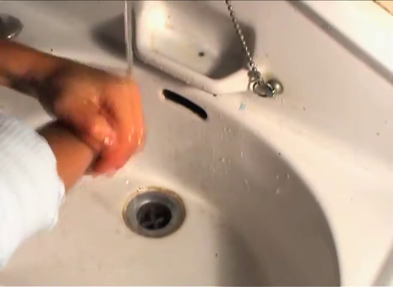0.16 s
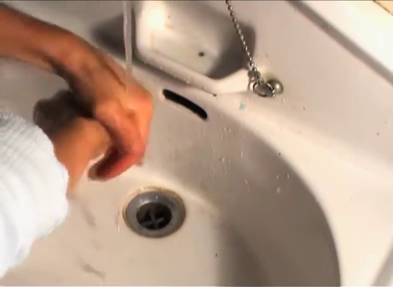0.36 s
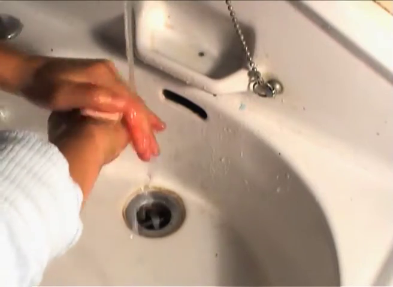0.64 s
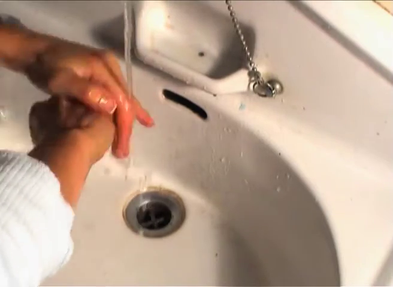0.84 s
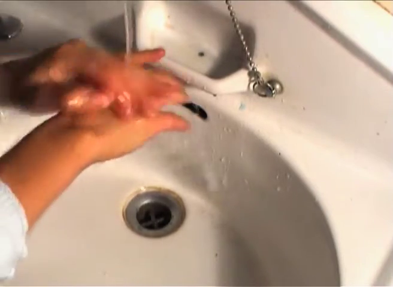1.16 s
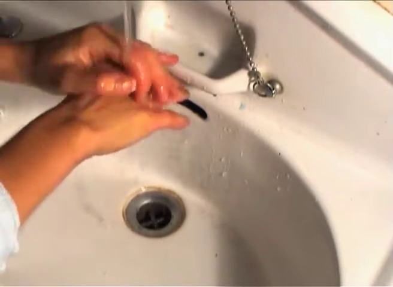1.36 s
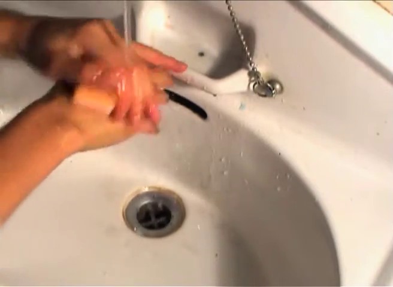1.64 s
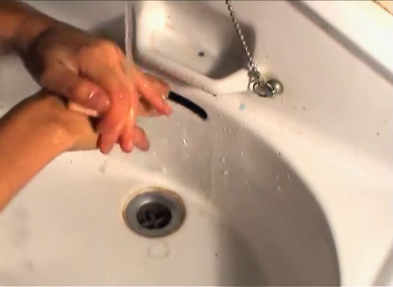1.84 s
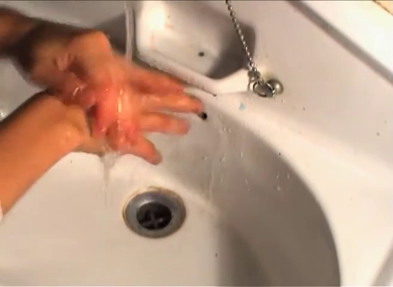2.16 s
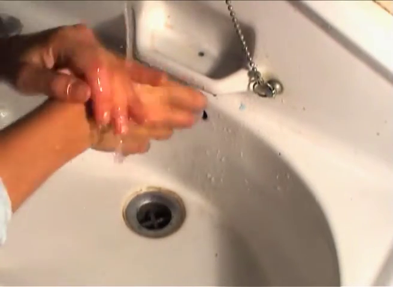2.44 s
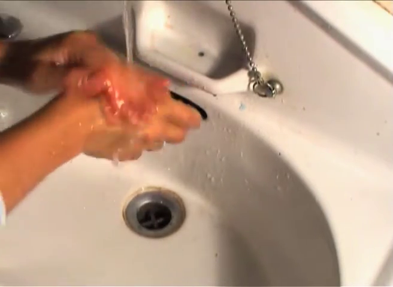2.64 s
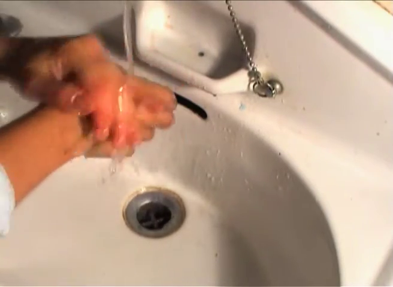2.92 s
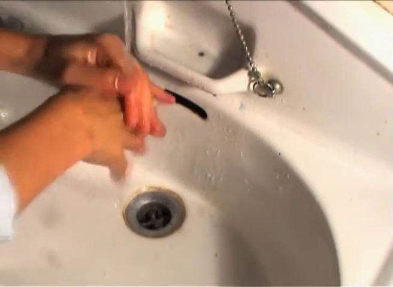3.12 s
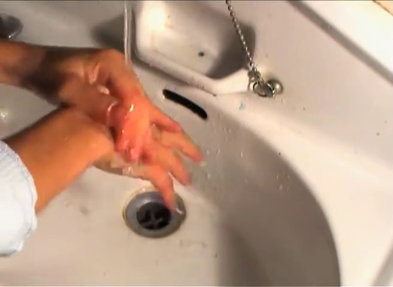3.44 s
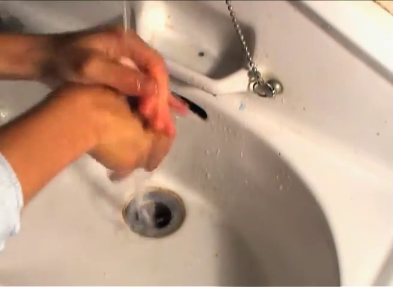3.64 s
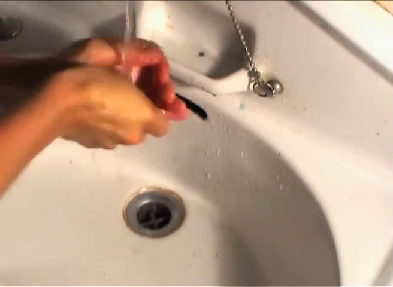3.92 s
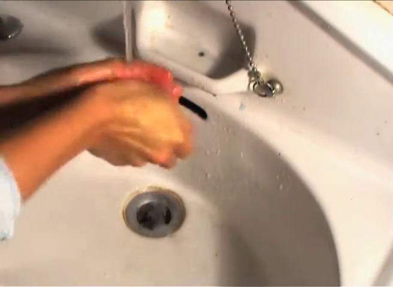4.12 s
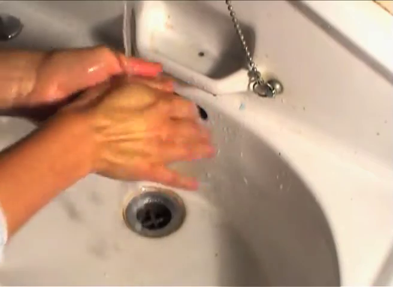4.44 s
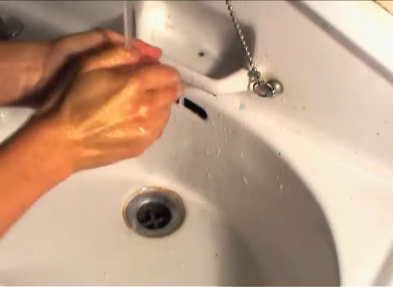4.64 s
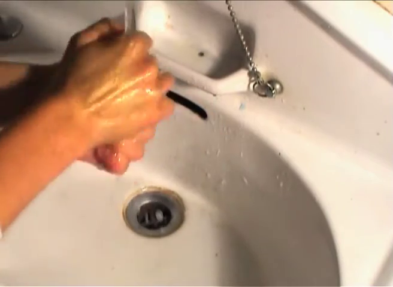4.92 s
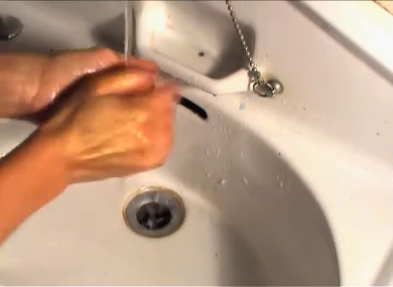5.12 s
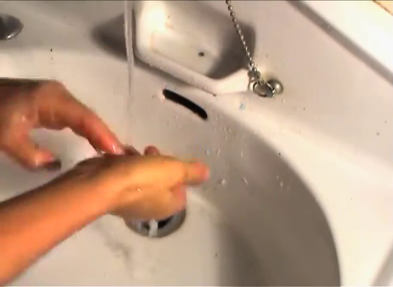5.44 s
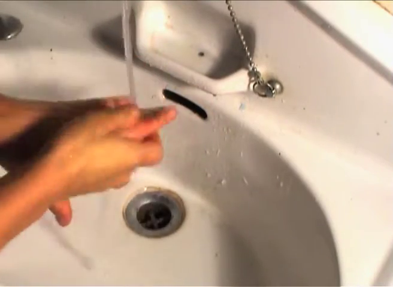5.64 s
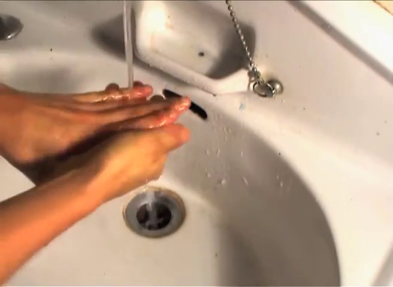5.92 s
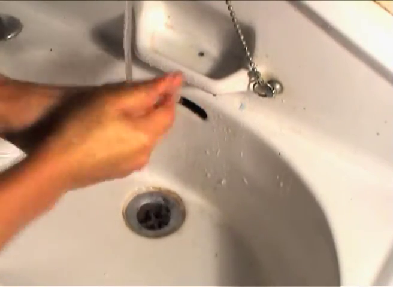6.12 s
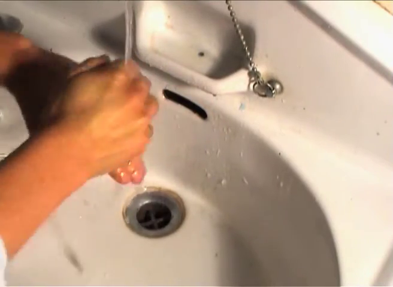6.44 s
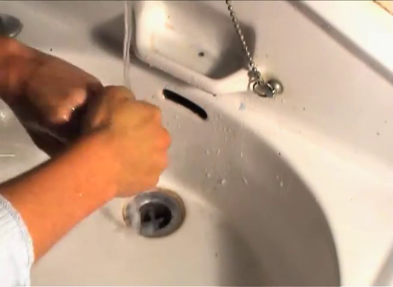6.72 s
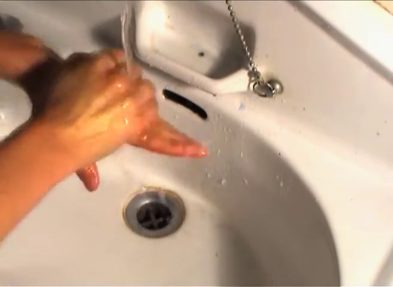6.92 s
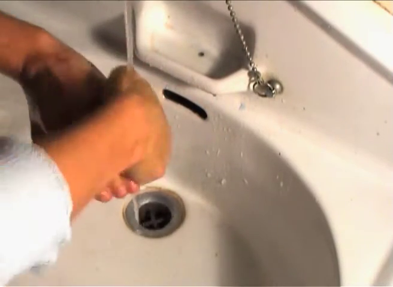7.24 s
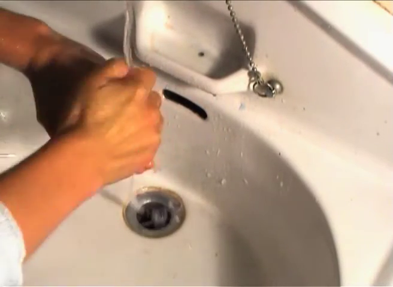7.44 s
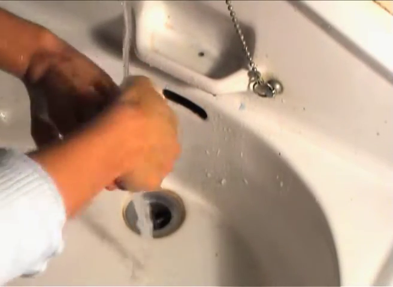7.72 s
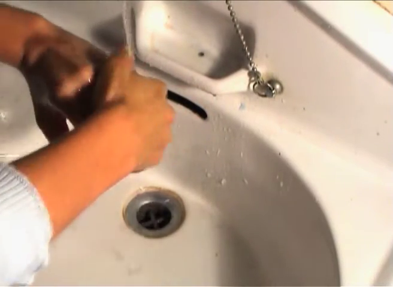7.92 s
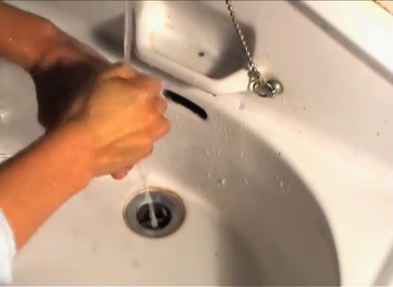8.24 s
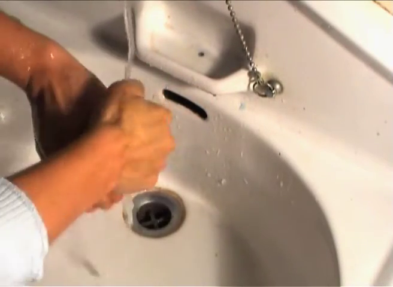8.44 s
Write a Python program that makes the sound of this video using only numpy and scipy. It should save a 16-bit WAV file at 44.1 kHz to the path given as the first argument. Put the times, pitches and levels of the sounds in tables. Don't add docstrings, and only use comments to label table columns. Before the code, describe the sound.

Steady tap trickle in a small tiled bathroom, with hand-washing squelches, crisp droplet spatters and occasional hollow gulps from the drain.

```python
import sys
import numpy as np
from scipy import signal
from scipy.fft import rfft, irfft, next_fast_len
from scipy.io import wavfile
from scipy.ndimage import uniform_filter1d, map_coordinates

SR = 44100
rng = np.random.default_rng(int(sys.argv[2]) if len(sys.argv) > 2 else 0)


def transcribe(u):
    v = np.clip(np.atleast_2d(u).T, -1, 1)
    q = np.round(v * 32767).astype(np.int16)
    wavfile.write(sys.argv[1], SR, q)


def undo_db(level):
    steps = np.asarray(level, float) / 20
    return 10 ** steps


N = 377937


def unit(x):
    return x / np.sqrt(np.mean(x ** 2) + 1e-20)


def along(points, hz):
    f, value = np.transpose(points)
    return np.interp(np.log(hz + 1), np.log(f + 1), value)


def wobble(rate):
    return map_coordinates(rng.standard_normal(N // 100), [np.arange(N) * rate / SR])


def filtered(x, response):
    m = next_fast_len(N + SR // 2)
    return irfft(rfft(x, m) * response(np.fft.rfftfreq(m, 1 / SR)), m)[..., :N]


def modes(table):
    return lambda f: sum(undo_db(db) * 1j * f * width / (centre * centre - f * f + 1j * f * width)
                         for centre, width, db in table)


def bubbles(s, db, hz, rise, cycles, size):
    s, db, hz, rise, cycles = (v[:, None] for v in np.broadcast_arrays(s, db, hz, rise, cycles))
    start = np.floor(s * SR).astype(int)
    step = np.arange(size)
    age = np.maximum(step / SR - (s - start / SR), 0) * hz / cycles
    climb = np.log(np.maximum(rise, .6))
    turns = cycles * (age + climb * (np.minimum(age, 3) ** 2 / 2 - age / 2))
    envelope = undo_db(db) * 4 * age * np.exp(1 - 2 * age - age * age / 2)
    wave = envelope * np.sin(2 * np.pi * turns)
    return np.bincount((start + step).ravel(), wave.ravel(), N + size)[:N]


def tiles(x, wet_db):
    # frequency in Hz, time to fall 60 dB in seconds.
    decay = [(200, 0.37), (1500, 0.3), (4000, 0.25), (10000, 0.15), (16000, 0.14)]
    hz, t, z = signal.stft(rng.standard_normal((6, SR // 2)), SR, nperseg=128)
    fade = undo_db(-60 * t / along(decay, hz)[:, None])
    tails = signal.istft(z * fade, SR, nperseg=128)[1]
    age = np.arange(tails.shape[1]) / SR
    bowl = 1 + 1.5 * undo_db(-60 * age / .05)
    tails = tails * (age > .0015) * bowl
    tails = tails / np.linalg.norm(tails, axis=1, keepdims=True)
    place = np.arange(N) * 10 // SR % 6 == np.arange(6)[:, None]
    return x + undo_db(wet_db) * signal.fftconvolve(x * place, tails, axes=1)[:, :N].sum(axis=0)


def tap():
    # frequency in Hz, level in dB per Hz.
    air = [(12, -38), (25, -6.5), (60, -9), (160, -5.5), (500, 6.5), (1370, -5.5), (2900, -4.5),
           (4700, -10.5), (8600, -10.5), (12400, -11.5), (15500, -24)]
    # frequency in Hz, width in Hz, level in dB.
    hiss_modes = [(2680, 50, 5), (3186, 25, 12), (3410, 18, 21), (3535, 22, 16), (4170, 40, 11),
                  (4895, 50, 12), (8500, 200, 11), (11000, 100, 6)]
    # frequency in Hz, level in dB rms.
    mains = [(116, -72.5)]
    hiss_ring = modes(hiss_modes)
    hiss = filtered(rng.standard_normal(N), lambda f: undo_db(along(air, f)) * (1 + np.abs(hiss_ring(f))))
    t = np.arange(N) / SR
    hum = sum(undo_db(db + 2.5 + 1.5 * wobble(3.37)) * np.sin(2 * np.pi * hz * t) for hz, db in mains)
    return undo_db(-45.5 + wobble(3.71)) * unit(hiss) + hum


def spray():
    # time in seconds, patter in dB, brightness in dB per octave.
    thrown = [(0, -37.5, -1.5), (.5, -39, -3), (.9, -36, -1.5), (1.6, -34.5, -1), (2.3, -35, 0),
              (3.1, -36, 0.5), (3.7, -36, -3), (4.4, -36.5, -2), (5.1, -35.5, 0.5), (5.45, -33.5, -1),
              (5.7, -37, -3.5), (6.1, -35.5, 1.5), (6.6, -33.5, -3.5), (7.2, -35, -0.5), (7.6, -34, -0.5),
              (7.9, -37.5, -6), (8.2, -36, -0.5), (8.57, -30.5, -3.5)]
    # frequency in Hz, level in dB per Hz.
    colour = [(880, 12.5), (1500, 13.5), (2010, 2), (2280, -4), (3480, 2), (8370, 10), (12400, 9.5),
              (15500, 10)]
    knots, levels, tilts = np.transpose(thrown)
    t = np.arange(N) / SR
    db = np.interp(t, knots, levels)
    tilt = np.interp(t, knots, tilts)
    late, pitch, rarity, opening = rng.random((5000, 4)).T
    when = late * (N - 1) / SR
    hz = 2200 * 6.5 ** pitch
    size_db = np.minimum(-4 * np.log(1 - rarity), 8)
    size_db = size_db + tilt[(when * SR).astype(int)] * np.log2(hz / 6500)
    drops = unit(bubbles(when, size_db, hz, rise=1.1 + .5 * opening, cycles=6, size=300))
    wash = undo_db(-20.5 + 0.28 * wobble(30)) * rng.standard_normal(N)
    patter = unit(filtered(drops + wash, lambda f: undo_db(along(colour, f))))
    return undo_db(db - 11.5 + 2.6 * np.tanh(wobble(15))) * patter


def slugs():
    # start in seconds, length in seconds, level
    # in dB rms.
    run_off_slugs = [(0.049, 0.015, -39.5), (0.094, 0.035, -42.5), (0.147, 0.087, -45.5), (0.242, 0.056, -43.5),
                     (0.322, 0.039, -41), (0.408, 0.086, -47), (0.533, 0.066, -46), (0.602, 0.057, -46.5),
                     (0.694, 0.038, -48), (0.747, 0.023, -39.5), (0.804, 0.019, -46), (0.848, 0.022, -42.5),
                     (0.892, 0.028, -45), (0.994, 0.059, -42.5), (1.107, 0.055, -47), (1.184, 0.051, -43),
                     (1.281, 0.054, -42), (1.353, 0.031, -46), (1.421, 0.045, -40), (1.506, 0.028, -36.5),
                     (1.556, 0.065, -42.5), (1.671, 0.058, -44.5), (1.759, 0.026, -42), (1.795, 0.047, -45.5),
                     (1.865, 0.064, -51), (1.99, 0.078, -42.5), (2.098, 0.037, -51), (2.153, 0.018, -49),
                     (2.195, 0.031, -44), (2.24, 0.045, -41), (2.344, 0.078, -43.5), (2.445, 0.031, -41.5),
                     (2.505, 0.032, -45), (2.544, 0.043, -45.5), (2.633, 0.029, -45), (2.686, 0.031, -45),
                     (2.732, 0.034, -50), (2.782, 0.048, -46), (2.847, 0.049, -40.5), (2.931, 0.015, -40),
                     (2.97, 0.03, -46), (3.018, 0.039, -47), (3.084, 0.027, -49), (3.117, 0.02, -43),
                     (3.157, 0.03, -45), (3.224, 0.036, -49), (3.283, 0.039, -44), (3.36, 0.022, -44),
                     (3.395, 0.023, -48), (3.437, 0.013, -36.5), (3.467, 0.086, -47.5), (3.581, 0.035, -40.5),
                     (3.641, 0.045, -42.5), (3.727, 0.013, -37.5), (3.78, 0.052, -41),
                     (3.865, 0.039, -41), (3.904, 0.11, -49), (4.018, 0.069, -46), (4.112, 0.021, -46),
             (4.145, 0.033, -44), (4.23, 0.12, -46.5), (4.344, 0.058, -45), (4.427, 0.076, -44.5),
             (4.498, 0.057, -46), (4.586, 0.079, -45), (4.699, 0.032, -45), (4.76, 0.017, -47),
             (4.797, 0.03, -43), (4.891, 0.092, -50), (4.998, 0.043, -46.5), (5.07, 0.029, -43),
             (5.144, 0.027, -41.5), (5.188, 0.081, -44), (5.307, 0.057, -43), (5.438, 0.02, -47),
             (5.528, 0.023, -44), (5.572, 0.022, -53), (5.731, 0.023, -39), (5.781, 0.041, -44),
             (5.892, 0.066, -47), (6.006, 0.045, -45.5), (6.114, 0.12, -43.5), (6.218, 0.062, -55),
             (6.283, 0.082, -44.5), (6.35, 0.071, -49.5), (6.426, 0.041, -46), (6.475, 0.053, -49),
             (6.62, 0.083, -46), (6.746, 0.062, -41), (6.87, 0.082, -42), (7.012, 0.053, -42),
             (7.08, 0.061, -46), (7.203, 0.039, -42), (7.274, 0.089, -46), (7.425, 0.047, -41),
             (7.557, 0.075, -40.5), (7.723, 0.02, -42), (7.795, 0.071, -42.5), (7.913, 0.075, -42),
             (8.019, 0.027, -35), (8.059, 0.034, -43.5), (8.125, 0.081, -38), (8.278, 0.042, -45),
             (8.419, 0.03, -42), (8.501, 0.026, -40.5),
                     (5.4, 0.041, -44.5),
        (5.618, 0.086, -42.5),
        (8.374, 0.046, -44.5),
    ]
    s, length, db = np.transpose(run_off_slugs)
    edges = np.clip(np.round(np.r_[s, s + length] * SR).astype(int), 0, N - 1)
    flow = np.cumsum(np.bincount(edges, np.r_[undo_db(db), -undo_db(db)], N))
    soft_edge_s, slug_db, trickle_db = 0.011, -1, -62
    return undo_db(trickle_db) + undo_db(slug_db) * uniform_filter1d(flow, int(soft_edge_s * SR))


def drain():
    # time in seconds, peak in dB, pitch in Hz.
    gulp_events = [(4.043, -35, 1010), (5.402, -31.5, 460), (5.418, -32, 454), (5.439, -28, 466),
                   (5.46, -23, 450), (5.529, -32, 422), (5.546, -25, 487), (5.58, -16.5, 482),
                   (5.587, -18.5, 540), (5.598, -29, 600), (5.628, -36, 500), (5.643, -37, 675),
                   (5.684, -35, 590), (0.447, -38, 560), (6.762, -31.5, 550), (7.091, -24.5, 575),
                   (8.15, -32, 610), (8.428, -30.5, 576)]
    # frequency in Hz, width in Hz, level in dB.
    low_modes = [(250, 32, -8), (328, 30, -6), (505, 35, -2), (610, 35, 0), (670, 45, -1), (780, 80, 0),
                 (940, 26, 3), (1305, 40, -10), (1490, 40, -7)]
    s, db, hz = np.transpose(gulp_events)
    gulps = bubbles(s, db, hz, rise=1, cycles=3, size=2000)
    when, pitch, size = rng.random((2500, 3)).T
    slap_db = 12 * size + 3 * pitch
    slaps = bubbles(when * (N - 1) / SR, slap_db, 240 * 4.2 ** pitch, rise=1.1, cycles=2.5, size=900)
    run_off = undo_db(2.5) * slugs() * unit(slaps)
    wet = tiles(undo_db(-2.5) * gulps, wet_db=-12) + run_off
    low_ring = modes(low_modes)

    def throat(f):
        return signal.freqs([1, 0, 0], [1, 1300, 1420 ** 2], 2 * np.pi * f)[1]

    return filtered(wet, lambda f: low_ring(f) * throat(f) ** 2) + undo_db(-10) * gulps


def ticks():
    # time in seconds, level in dB, pitch in Hz.
    droplets = [(0.0223, -26.5, 9800), (0.227, -30.5, 9550), (0.687, -27, 15100), (0.7561, -22, 15100),
                (0.8352, -24, 13000), (0.849, -17.5, 8200), (0.9674, -30, 9200), (0.987, -25.5, 9400),
                (1.022, -34, 4270), (1.1313, -22.5, 9400), (1.2717, -23, 8800), (1.4529, -24.5, 11300),
                (1.66, -29, 15100), (1.6932, -31, 5800), (1.8441, -28, 12000), (1.876, -24, 9300),
                (1.9768, -34, 13700), (2.3414, -22, 7700), (2.401, -24, 8900), (2.4199, -23, 8850),
                (2.4705, -24, 9500), (3.5206, -27.5, 9700), (3.554, -25, 8700), (3.608, -26, 4000),
                (3.6776, -22.5, 9500), (3.73, -30, 11500), (3.7894, -24.5, 8000), (3.8517, -22, 10700),
                (3.857, -21, 5600), (3.865, -23, 9000), (3.9882, -27, 12000), (4.059, -26, 3750),
                (4.298, -18, 15000), (4.438, -29, 4700), (4.4766, -24, 7300), (4.928, -23, 6700),
                (5.6809, -27, 10200), (5.8257, -27, 5100), (5.9211, -25, 11400), (5.9285, -25, 3600),
                (6.1398, -25, 10000), (6.2026, -37, 13200), (6.4491, -25, 10900), (6.4677, -25, 9900),
                (6.513, -28, 10000), (6.5477, -27, 8750), (6.6861, -33, 10300), (6.8007, -27.5, 7200),
                (6.8346, -23.5, 10700), (6.9446, -29, 11000), (7.0708, -25, 5700), (7.2757, -26.5, 10200),
                (7.3152, -23, 10000), (7.4543, -24, 9400), (7.5154, -27, 3600), (7.8592, -24, 9000),
                (8.2229, -23, 7150)]
    s, db, hz = np.transpose(droplets)
    return bubbles(s, db - 1, hz, rise=1.5, cycles=4 * (hz / 6000) ** .5, size=400)


def finger_pops():
    # time in
    # seconds, peak in dB, pitch in Hz, pitch rise as a ratio.
    finger_pockets = [(1.2456, -21, 8550, 2.4), (1.496, -25, 10800, 1.7), (1.6935, -22, 8140, 1.9),
                      (1.7165, -17, 8000, 2.9), (1.9278, -19.5, 8500, 1.2), (1.949, -22.5, 9350, 1.4),
                      (2.0217, -26, 10600, 1.5), (2.4773, -19.5, 8000, 2.4), (3.1981, -26.5, 9800, 3.1),
                      (3.4213, -22.5, 8000, 1.8), (3.858, -23.5, 9200, 1.3), (4.0585, -20, 11300, 1.4),
                      (4.59, -23.5, 8800, 1.2), (4.6144, -25.5, 11200, 1.7), (5.1826, -23.5, 8000, 1.6),
                      (5.2902, -10, 8000, 1.4), (5.685, -23.5, 10400, 1.4), (5.7306, -17.5, 8200, 2),
                      (5.8264, -21.5, 11500, 2), (5.9794, -25, 8640, 2), (6.2916, -18, 9100, 1.9),
                      (6.3071, -11.5, 8900, 1.76), (6.33, -18, 10800, 2.9), (6.7385, -21.5, 10000, 1.35),
                      (7.0262, -25, 8800, 2.8), (7.0754, -17, 9400, 1.37), (7.3083, -28, 8500, 1.4),
                      (7.4031, -20.5, 10700, 2.7),
                      (0.0316, -21, 6750, 0.81), (0.817, -32, 5500, 3), (1.0664, -21.5, 6530, 1.4),
               (1.1039, -18, 6000, 3.5), (1.484, -25.5, 6400, 3.4), (2.153, -24, 6040, 4.8),
               (2.575, -28, 5370, 0.98), (3.004, -27, 5070, 3.1), (3.259, -27, 7300, 1.1),
               (5.477, -28.5, 6900, 1.5), (5.543, -29.5, 7400, 1.5), (7.635, -36, 9500, 2),
               (7.733, -36, 9100, 2), (2.6523, -25.5, 7160, 2.7), (2.8812, -23.5, 6400, 1.3),
               (2.8978, -19.5, 6560, 2.7), (2.928, -17.5, 6700, 2), (3.359, -22, 7000, 1.5),
               (3.7102, -22, 7200, 1.9), (3.7984, -31, 7660, 1.5), (4.125, -22, 5500, 1.5),
               (4.2712, -24.5, 6600, 1.05), (4.6652, -19, 6260, 2.7), (4.7403, -20.5, 6760, 1.76),
               (4.965, -20, 6530, 1.7), (5.849, -23.5, 5750, 3.6), (6.2435, -17, 6740, 2.4),
               (6.3053, -12, 5680, 2), (6.414, -14, 7100, 2.2), (6.9987, -26.5, 6450, 1.5),
               (7.9603, -38, 6960, 1.8), (7.9832, -15, 6760, 1.2), (8.035, -20, 7500, 2.2),
               (8.4682, -25.5, 6700, 1.2),
                      (5.2425, -32.5, 3620, 2.3), (1.067, -21.5, 3630, 1.24), (1.483, -27.5, 3740, 0.97),
                (1.947, -25.5, 4920, 1.9), (1.9596, -24.5, 3900, 1.23), (2.397, -28.5, 3570, 0.8),
                (2.5732, -25, 3700, 1.1), (2.7739, -25, 3280, 1.6), (2.879, -23.5, 3860, 1.4),
                (2.9767, -22.5, 4400, 1.2), (3.476, -29, 5300, 1.6), (3.5832, -32, 3760, 2.2),
                (4.2228, -24, 3570, 1.37), (4.4832, -27.5, 4280, 2.2), (4.591, -20.5, 3780, 2.14),
                (4.8383, -25, 5200, 2.8), (4.9274, -17, 4900, 1.4), (5.0585, -24, 4230, 1.6),
                (5.922, -26, 5240, 1.8), (6.308, -23, 4450, 2.9), (6.4174, -23, 3050, 1.3),
                (7.3001, -26.5, 4350, 1.8), (7.389, -25, 4300, 0.77), (7.409, -24, 4400, 0.89),
                (7.452, -15, 3620, 1.65), (7.961, -23, 3470, 0.84), (8.184, -29, 4660, 3.1)]
    s, db, hz, rise = np.transpose(finger_pockets)
    db = db - 2.5
    pops = bubbles(s, db, hz, np.minimum(rise, 1.9), cycles=10 * (hz / 6000) ** .5, size=400)
    cracks = bubbles(s, db - 17, 8000, rise=1, cycles=.6, size=40)
    late, size, pitch = rng.standard_normal((len(s), 3)).T
    after_s = np.minimum(s + .006 * np.exp(late / 2), (N - 1) / SR)
    after_hz = np.clip(hz * 2 ** (.25 * pitch), 3000, 13000)
    after_cycles = 8 * (after_hz / 6000) ** .5
    after = bubbles(after_s, db - 10 + 2 * size, after_hz, rise=1.52, cycles=after_cycles, size=400)
    return pops + cracks + after


def palm_squelches():
    # time in seconds, peak in dB, pitch in Hz, pitch rise as a ratio.
    pockets = [(0.2078, -30, 1680, 1.6), (1.0235, -22, 2820, 3), (1.211, -30.5, 1910, 0.91),
               (1.868, -25, 2800, 0.87), (2.0532, -35, 2190, 0.93), (2.427, -21.5, 2950, 3.8),
               (2.5578, -21, 2620, 1), (2.559, -27, 2160, 0.95), (2.7731, -26, 2960, 1.2),
               (2.8767, -18.5, 2680, 1.03), (3.982, -24.5, 2850, 2.3), (4.0373, -27.5, 1650, 4.5),
               (4.076, -16.5, 1790, 1.26), (4.187, -23, 3040, 1.6), (4.591, -23, 2930, 1.25),
               (4.8332, -29.5, 2540, 1.4), (5.056, -24.5, 2750, 0.72), (5.959, -18.5, 3150, 2.8),
               (6.3092, -18, 2950, 1.26), (6.684, -27, 2710, 0.94), (6.997, -21, 2160, 2.2),
               (7.4481, -13.5, 2300, 1.43), (7.875, -28, 2440, 1.3), (7.9862, -18.5, 3050, 1.7),
               (8.174, -22, 2150, 1.3), (8.468, -18, 2810, 1.65), (8.5322, -26, 2000, 1.4)]
    s, db, hz, rise = np.transpose(pockets)
    first = bubbles(s, db - 8, hz, rise, cycles=6.1, size=1200)
    late, pitch = rng.standard_normal((len(s), 2)).T
    after_s = np.minimum(s + .012 * np.exp(late / 2), (N - 1) / SR)
    after_hz = hz * 2 ** (.0625 * pitch)
    second = bubbles(after_s, db - 19, after_hz, rise=0.96, cycles=6.1, size=1200)
    return first + second


def drips():
    # time in seconds, peak in dB, pitch in Hz.
    falls = [
        (0.33, -50, 1410),
        (1.384, -41, 1700),
        (2.862, -43, 1330),
        (5.255, -44.5, 1340),
        (6.685, -40, 1900),
        (7.203, -46, 1180),
        (7.268, -45, 1460),
        (7.366, -33.5, 3130),
        (7.59, -36, 3200),
    ]
    s, db, hz = np.transpose(falls)
    return bubbles(s, db, hz, rise=1.2, cycles=8, size=1200)


def strokes():
    # start in seconds, level in dB rms, length in seconds, middle pitch in Hz.
    rubs = [(0.784, -28, 0.078, 7500), (1.021, -26, 0.028, 7550), (1.194, -29.5, 0.066, 7750),
            (1.482, -28, 0.041, 6800), (1.67, -28.5, 0.072, 7600), (1.93, -28.5, 0.08, 6800),
            (2.108, -32.5, 0.096, 5850), (2.338, -33, 0.16, 7100), (2.565, -32, 0.033, 4420),
            (2.867, -33, 0.16, 6100), (3.174, -33.5, 0.059, 7950), (3.352, -35.5, 0.11, 6500),
            (3.515, -35, 0.098, 6060), (3.79, -32, 0.084, 7460), (4.001, -28.5, 0.11, 6300),
            (4.161, -32, 0.26, 6170), (4.591, -27.5, 0.069, 6440), (4.92, -27, 0.087, 6560),
            (5.274, -31.5, 0.071, 7640), (5.658, -32.5, 0.11, 8140), (5.833, -35, 0.19, 6500),
            (6.198, -29.5, 0.1, 5800), (6.318, -27, 0.074, 7300), (6.42, -33, 0.082, 6400),
            (6.941, -34.5, 0.18, 7760), (7.301, -31, 0.075, 6500), (7.39, -30, 0.14, 5570),
            (7.958, -22.5, 0.068, 6250), (8.038, -28.5, 0.17, 5600)]
    s, db, length, hz = np.transpose(rubs)[:, :, None]
    pitch, size = rng.standard_normal((len(s), 2, 45)).transpose(1, 0, 2)
    late = rng.random((len(s), 45)) ** 1.3
    db = db + 10 * np.log10(length * 10) + 7 * np.clip(size, -3, 1) + 3 * np.minimum(pitch, 0)
    hz = np.clip(hz * 2 ** (0.669 * pitch), 3300, 14000).ravel()
    s = np.minimum(s + length * late, (N - 1) / SR).ravel()
    return bubbles(s, db.ravel() - 6.5, hz, rise=1.5, cycles=5.5, size=400)


def cups():
    # time in seconds, peak in dB, pitch in Hz, life in seconds.
    notes = [
        (1.735, -42, 2170, .008),
        (4.006, -33, 5900, .008),
        (4.044, -36, 3750, .015),
        (5.548, -45, 1310, .01),
        (7.093, -36, 1330, .012),
        (7.863, -46, 1460, .04),
        (7.864, -36, 2350, .01),
        (7.877, -40, 2960, .022),
        (7.879, -35, 2360, .03),
    ]
    s, db, hz, life = np.transpose(notes)
    flutter = 1 + wobble(400)
    return flutter * bubbles(s, db, hz, rise=1.03, cycles=hz * life, size=4000)


def nulls(f):
    width_hz, depth_db = 40, -14
    response = 1
    for centre in (385, 566, 703):
        reactive = centre * centre - f * f
        loss = 1j * f * width_hz
        response = response * (reactive + loss * undo_db(depth_db)) / (reactive + loss)
    return response


def scene():
    splash = tiles(spray(), wet_db=4)
    hands = ticks() + finger_pops() + palm_squelches() + drips() + strokes()
    wet = tiles(hands, wet_db=0) + tiles(cups(), wet_db=-5)
    return filtered(wet + splash + drain() + tap(), nulls)[None]


def low_pass(x):
    return signal.sosfilt(signal.butter(12, 16980, fs=SR, output="sos"), x)


def record(dry):
    # frequency in Hz, gain in dB.
    edge = [(15700, 0), (15900, -50), (16950, -54), (17100, -90)]
    mix = filtered(dry, lambda f: undo_db(along(edge, f)))
    return low_pass(mix)


dry = scene()
out = record(dry)
transcribe(out)
```